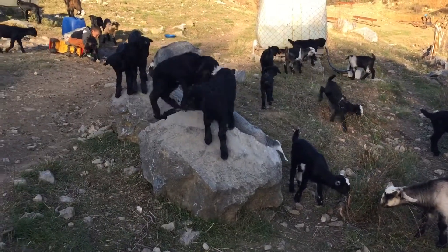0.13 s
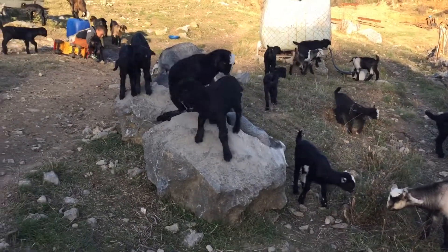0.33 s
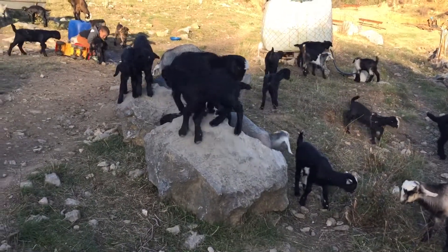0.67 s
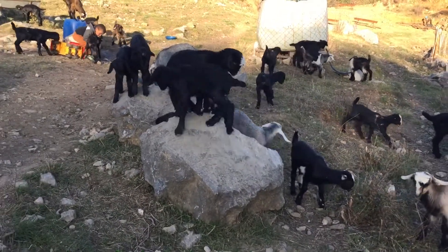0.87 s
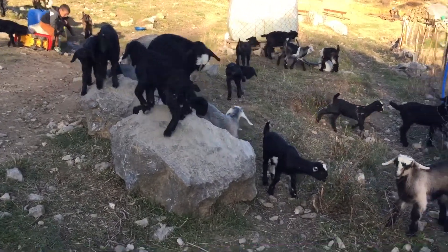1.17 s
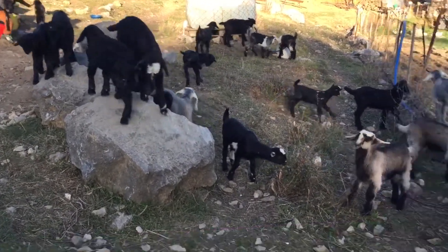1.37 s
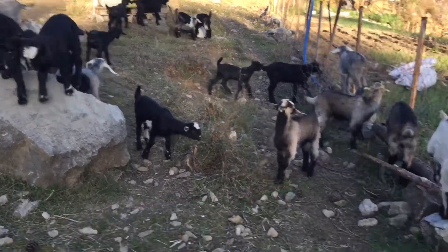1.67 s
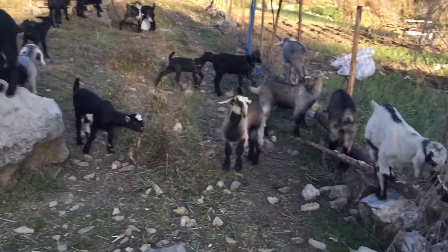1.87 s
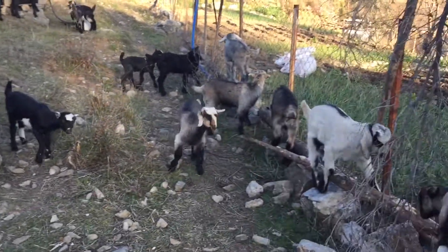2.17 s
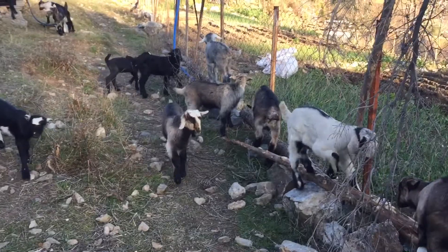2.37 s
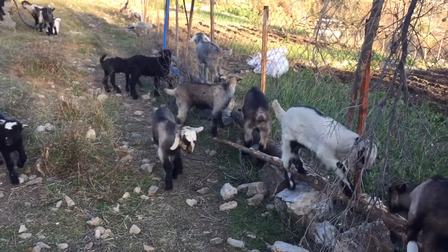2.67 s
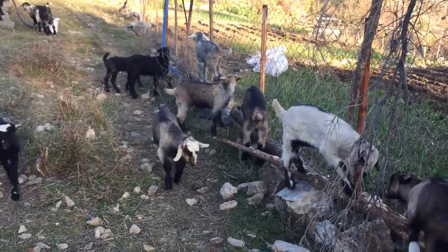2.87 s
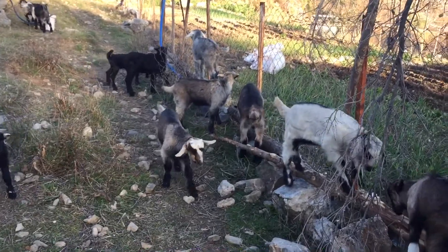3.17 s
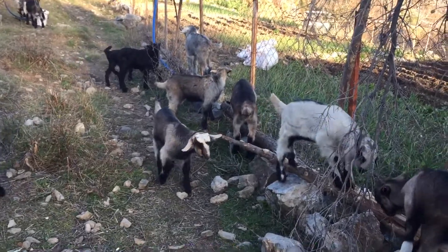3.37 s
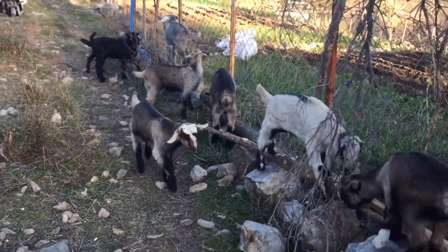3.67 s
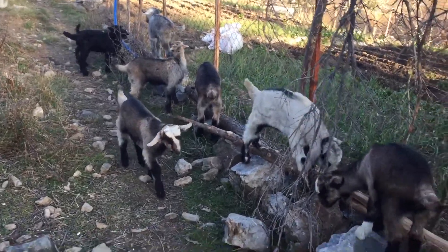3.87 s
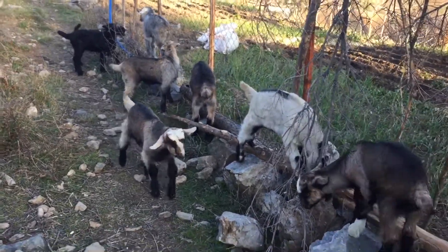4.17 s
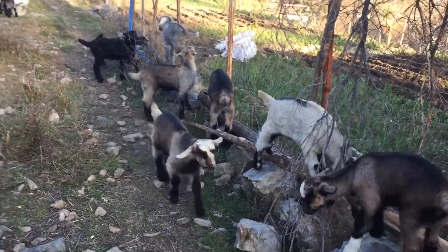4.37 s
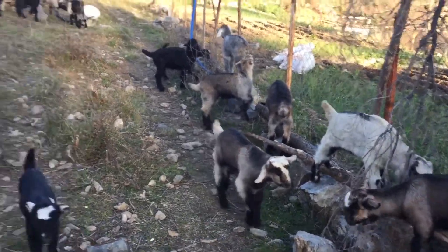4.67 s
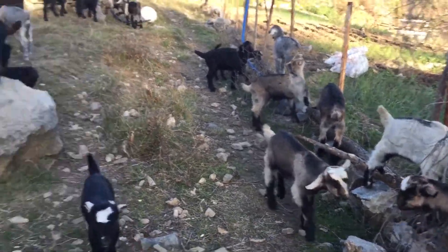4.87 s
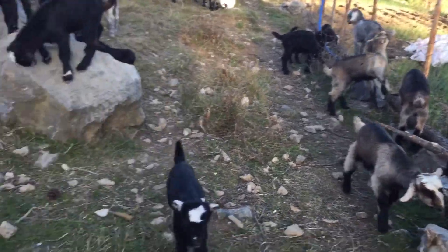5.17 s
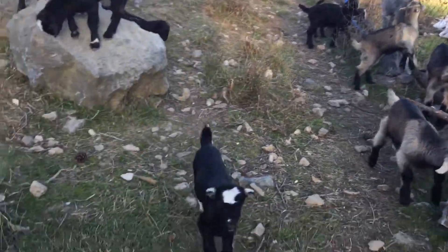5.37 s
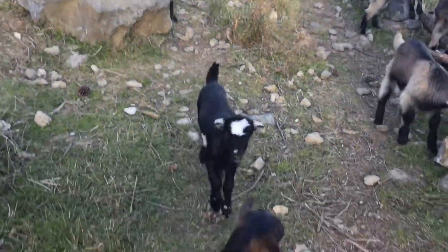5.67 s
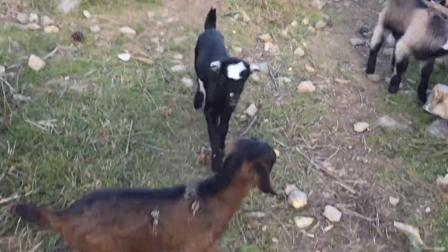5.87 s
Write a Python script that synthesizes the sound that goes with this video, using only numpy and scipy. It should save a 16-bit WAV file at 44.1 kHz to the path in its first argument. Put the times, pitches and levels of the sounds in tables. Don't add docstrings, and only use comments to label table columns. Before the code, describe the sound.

Small hooves knock, tick and thud over stones, wood and dry grass on a quiet hillside, with bird chips and a faint far kid's bleat.

```python
import sys
import numpy as np
from scipy import signal
from scipy.fft import rfft, irfft
from scipy.io import wavfile

SR = 44100
rng = np.random.default_rng(int(sys.argv[2]) if len(sys.argv) > 2 else 0)


def voltage_ratio(decibels):
    exponent = np.asarray(decibels, float) / 20
    return 10 ** exponent


def to_wav(s):
    ch = np.atleast_2d(s).T
    pcm = np.round(np.clip(ch, -1, 1) * 32767)
    wavfile.write(sys.argv[1], SR, pcm.astype(np.int16))


N = 265482


def clock(seconds):
    return np.arange(round(seconds * SR)) / SR


def in_time(rows):
    s, *columns = np.transpose(rows)
    return [np.interp(np.arange(N) / SR, s, column) for column in columns]


def rms_one(x):
    return x / np.sqrt(np.mean(x ** 2) + 1e-20)


def band(x, low_hz, high_hz):
    edges = np.clip([low_hz, high_hz], 10, 0.45 * SR)
    return signal.sosfilt(signal.butter(2, edges, "band", fs=SR, output="sos"), x)


def drift(rate):
    r = np.exp(-80 * np.pi * rate / SR)
    slow = signal.lfilter([1], [1, -2 * r, r * r], rng.standard_normal(N // 40 + 2002))[2000:]
    return np.interp(np.arange(N) / 40, np.arange(len(slow)), rms_one(slow))


def add(out, s, sound, db):
    i = round(s * SR)
    part = sound[:N - i]
    out[i:i + len(part)] += voltage_ratio(db) * part / np.max(np.abs(sound))


def dying(t, t60):
    return voltage_ratio(-60 * t / np.clip(t60, 0.004, 2))


def blow(t, rise, t60):
    rise = np.clip(rise, 0.0006, 0.03)
    contact = np.sin(np.pi / 2 * np.minimum(t / rise, 1)) ** 2
    return contact * dying(np.maximum(t - rise, 0), t60)


def swells(rows):
    t = np.arange(0, N + 40, 40) / SR
    s, length, *levels = np.transpose(rows)
    bell = np.exp(-np.abs((t[:, None] - s) / (0.75 * length)) ** 2)
    gains = [np.sqrt(bell ** 2 @ voltage_ratio(2 * db)) for db in levels]
    return [np.interp(np.arange(N) / SR, t, gain) for gain in gains]


def grains(per_s, spread_db):
    sizes = voltage_ratio(spread_db * np.minimum(rng.exponential(1, N), 4)) * rng.choice([-1, 1], N)
    return sizes * (rng.random(N) < per_s / SR)


def pebbles(clicks, low_hz, high_hz, cycles):
    out, dealt = 0, rng.integers(0, 16, N)
    for k, hz in enumerate(np.geomspace(low_hz, high_hz, 16)):
        r, w = voltage_ratio(-60 * hz / (cycles * SR)), 2 * np.pi * hz / SR
        struck = clicks * (dealt == k) + 1e-18
        out = out + signal.lfilter([0, np.sin(w)], [1, -2 * r * np.cos(w), r * r], struck)
    return rms_one(out)


def note(length, start_hz, end_hz, bend):
    u = np.arange(round(length * SR)) / (length * SR)
    hz = start_hz + (end_hz - start_hz) * u ** bend
    return np.sin(2 * np.pi * np.cumsum(hz) / SR) * np.sin(np.pi * u ** 1.3)


def air():
    # f/Hz, level/dB
    colour = [(25, -9), (55, 0), (91, 1.5), (227, -6.5), (433, -11.5), (2170, -12), (4870, -15.5),
              (11500, -21.5)]
    hz, shape = np.fft.rfftfreq(N, 1 / SR), np.array(colour)
    gain = voltage_ratio(np.interp(np.log(hz + 1), np.log(shape[:, 0]), shape[:, 1]))
    hiss = rms_one(irfft(rfft(rng.standard_normal(N)) * gain, N))
    return voltage_ratio(-67 + drift(2.7) / 2) * hiss


def trampling():
    # t/s, level/dB
    herd_level = [(0, -75), (1.5, -77.5), (2.45, -74), (2.7, -71.5), (3.3, -72), (3.5, -76), (4.7, -73.5),
                  (5.1, -64.5), (5.45, -68.5), (5.6, -58), (5.85, -66), (5.92, -68), (6.02, -58)]
    grit_db, = in_time(herd_level)
    steps = grains(500 * voltage_ratio(4 * drift(14)), 3.5)
    grit = voltage_ratio(grit_db + 4) * band(pebbles(steps, 149, 2250, 14), 80, 1100)
    chips_of_stone = voltage_ratio(-78) * pebbles(grains(260, 3.9), 1205, 9000, 98)
    rumble = rms_one(band(band(rng.standard_normal(N), 33, 65), 30, 90))
    return grit + chips_of_stone + voltage_ratio(grit_db - 4 + 3.2 * drift(5)) * rumble


def thumps():
    # t/s, length/s, level/dB
    landings = [(0.218, 0.028, -53), (0.375, 0.045, -77), (0.715, 0.029, -60), (1.583, 0.047, -42.5),
                (2.138, 0.026, -44), (2.161, 0.041, -46.5), (2.288, 0.069, -54.5), (2.462, 0.091, -48),
                (2.693, 0.06, -45), (2.765, 0.032, -54), (2.925, 0.042, -49.5), (3.061, 0.041, -50.5),
                (3.169, .1, -45.5), (3.656, 0.041, -43), (3.845, 0.025, -46.5), (3.944, 0.08, -43),
                (4.016, 0.039, -48), (4.132, 0.03, -52), (4.525, 0.06, -57), (4.915, 0.032, -45),
                (4.965, 0.071, -52), (5.06, .1, -55), (5.118, 0.14, -50), (5.228, 0.027, -46),
                (5.319, 0.088, -48), (5.608, 0.081, -45.5), (5.873, 0.079, -53), (6.0, 0.051, -32)]
    out, t = np.zeros(N), clock(0.3)
    for (s, length, db), pick in zip(landings, rng.random(len(landings))):
        hz = (52 + 30 * pick) * (1 + 0.91 * np.exp(-t / 0.016))
        wave = np.sin(2 * np.pi * np.cumsum(hz) / SR)
        add(out, s - 0.284 * length, wave * blow(t, 0.28 * length, 1.97 * length), db)
    return out


def bleats():
    # t/s, length/s, mouth at start f/Hz, mouth at end f/Hz, level/dB
    cries = [
        (0.659, 0.26, 2300, 2200, -77.5),
        (1.272, 0.28, 2160, 2224, -76),
        (4.92, .2, 2300, 2050, -74),
        (5.27, .3, 2450, 2400, -71),
    ]
    out, t = np.zeros(N), np.arange(N) / SR
    for s, length, start_hz, end_hz, db in cries:
        mouth = np.interp(t, [s, s + length], [start_hz, end_hz])
        cycles = np.cumsum(210 * (1 + 0.09 * drift(40))) / SR
        pulses = np.diff(np.floor(cycles), prepend=0) + 0.12 * rng.standard_normal(N)
        width = band(pulses, 20, 280)
        voice = rms_one(width * np.sin(2 * np.pi * np.cumsum(mouth) / SR))
        held = np.clip(np.minimum(t - s, s + length - t) / 0.05, 0, 1)
        out += voltage_ratio(db + 2.9 * drift(20)) * voice * held
    return out


def warble():
    # t/s, length/s, start f/Hz, end f/Hz, level/dB
    syllables = [(4.21, .024, 3750, 4600, -67), (4.264, 0.024, 3750, 4600, -66),
                 (4.318, .03, 3700, 4020, -71), (4.338, 0.029, 3850, 4650, -67),
                 (4.396, 0.023, 3850, 4580, -67), (4.462, 0.028, 3800, 4600, -60.5),
                 (4.555, 0.032, 3900, 4670, -67), (4.592, .065, 4250, 4020, -62),
                 (4.594, 0.065, 4780, 4570, -61), (4.6, 0.032, 5200, 5070, -72),
                 (4.655, .036, 4380, 3980, -65), (4.795, 0.073, 4300, 4100, -71),
                 (4.815, 0.044, 4680, 4780, -70), (4.855, 0.023, 5300, 4920, -68.5)]
    out = np.zeros(N)
    for s, length, start_hz, end_hz, db in syllables:
        second_db = db - 4 - 20 * (length > 0.035)
        add(out, s - 0.006, note(length, start_hz, end_hz, 0.94), db)
        add(out, s, note(length, 1.02 * start_hz, 0.94 * end_hz, 0.94), second_db)
    return out * (1 + band(rng.standard_normal(N), 60, 450) * 2.5)


def whistle():
    # t/s, f/Hz, level/dB
    glide = [
        (2.195, 9560, -72),
        (2.25, 8950, -75),
        (2.3, 8400, -68),
        (2.345, 8060, -60.5),
        (2.42, 7810, -69),
        (2.475, 7550, -81),
    ]
    hz, db = in_time(glide)
    t = np.arange(N) / SR
    on = (t > glide[0][0]) & (t < glide[-1][0])
    tone = np.sin(2 * np.pi * np.cumsum(hz) / SR)
    return on * np.sqrt(2) * voltage_ratio(db + 1.9 * drift(40)) * tone


def chips():
    # t/s, peak level/dB, top f/Hz
    calls = [
        (0.508, -52, 7650),
        (.684, -52, 7900),
        (0.855, -50.5, 7850),
        (1.085, -48.5, 8000),
        (1.237, -51, 7520),
    ]
    out, length = np.zeros(N), 0.0105
    for s, db, top_hz in calls:
        add(out, s - 0.001, note(0.0065, 4630, 0.95 * top_hz, 0.81), db - 1.5)
        add(out, s + 0.002, note(length, 0.88 * top_hz, top_hz, 0.504), db)
        add(out, s + 0.003, note(length, 0.82 * top_hz, top_hz, 1), db - 8)
    return out * (1 + band(rng.standard_normal(N), 100, 500) * 2)


def birds():
    song = chips() + warble() + whistle()
    lag = clock(0.12)
    slope = rng.standard_normal(len(lag)) * dying(lag, 0.07)
    return song + voltage_ratio(-6) * signal.fftconvolve(song, slope / np.linalg.norm(slope))[:N]


def rubble():
    # t/s, length/s, level/dB
    slides = [(.33, .03, -64.5), (1.66, 0.046, -62), (2.16, .05, -60), (2.71, 0.047, -56),
              (3.17, 0.047, -55.5), (3.25, 0.027, -68), (3.315, .03, -62), (3.48, .06, -58.5),
              (3.93, 0.054, -59), (4.48, .04, -60), (4.84, .04, -66), (5.145, .025, -60),
              (5.49, 0.046, -55), (5.54, .04, -55.5), (5.595, .04, -53), (5.675, .05, -50), (5.8, .04, -55),
              (5.87, .04, -54), (5.965, 0.027, -49.5)]
    settling, = swells(slides)
    return settling * band(pebbles(grains(900, 3.8), 280, 1050, 18), 207, 1100)


def branch():
    # t/s, f/Hz, level/dB, t60/s
    hums = [(5.6, 300, -47, .8), (5.65, 116, -46, 2.), (5.63, 460, -35, .14), (5.624, 590, -35, .1),
            (5.624, 1030, -43, .12), (5.624, 1480, -44, .11), (5.768, 620, -41, .1), (5.772, 440, -42, .11),
            (5.465, 470, -41, .07), (.594, 440, -48, .14), (1.302, 985, -49, .09), (1.97, 980, -49, .07),
            (2.14, 1000, -58, .25)]
    out, t = np.zeros(N), clock(0.27)
    for (s, hz, db, t60), noise in zip(hums, rng.standard_normal((len(hums), len(t)))):
        rattle = rms_one(band(noise, 0.9 * hz, 1.155 * hz))
        edges = np.minimum(t * hz / 2.7, 1) * np.minimum((t[-1] - t) / 0.044, 1)
        add(out, s, (np.sin(2 * np.pi * hz * t) + 0.3 * rattle) * dying(t, t60) * edges, db)
    return out * voltage_ratio(1.5 * drift(25))


def pings():
    # t/s, peak level/dB, f/Hz, t60/s
    nudges = [(.195, -52, 620, .04), (1.58, -46, 170, .06), (2.13, -48, 205, .07), (3.49, -50, 125, .1),
              (3.851, -50, 3000, .015), (3.859, -45, 740, .07), (3.86, -46, 3200, .03),
              (3.859, -49, 6200, .012), (3.88, -49, 2050, .07), (3.88, -50, 3200, .03),
              (3.912, -48, 2950, .02), (3.922, -47, 1950, .02), (3.933, -49, 3500, .02),
              (3.946, -49, 5900, .015), (3.998, -48, 2500, .04), (4.815, -56, 1350, .03),
              (4.825, -55, 620, .06), (4.886, -54, 1650, .03), (4.886, -53, 600, .04),
              (5.095, -47, 110, .12), (5.135, -49, 1480, .05), (5.296, -51, 2250, .04),
              (5.345, -56, 2350, .04), (5.42, -56, 2400, .05), (5.842, -45, 1150, .05),
              (5.865, -47, 1300, .02), (5.949, -44, 1150, .03), (5.986, -39, 1050, .04),
              (.61, -51, 440, .08), (2.221, -50, 780, .03), (2.567, -36, 1550, .035),
              (2.842, -50, 11500, .01), (2.85, -50, 5000, .01), (2.907, -47, 3500, .012),
              (2.915, -44, 14000, .01), (2.936, -45, 13000, .01), (2.965, -43, 13000, .012),
              (2.974, -49, 11500, .01), (3.149, -42, 750, .05), (3.175, -40, 180, .05),
              (3.29, -48, 1400, .04), (5.108, -53, 1150, .06), (5.148, -51, 1500, .03),
              (5.288, -51, 2900, .02), (2.955, -53, 1520, .1), (3.93, -41, 84, .16), (5.305, -42, 148, .07),
              (4.8, -52, 190, .08)]
    out, t = np.zeros(N), clock(0.15)
    for (s, db, hz, t60), apart in zip(nudges, rng.uniform(0.04, 0.12, len(nudges))):
        pair = np.sin(2 * np.pi * hz * t) + 0.5 * np.sin(2 * np.pi * hz * (1 + apart) * t)
        add(out, s, pair * blow(t, 1.5 / hz, t60), db)
    return out


def ticks():
    # t/s, peak level/dB, centre f/Hz, bright part level/dB
    snaps = [(0.21, -41, 14300, -6), (0.9662, -45, 12800, -17), (1.124, -46, 3480, -14),
             (1.1513, -45.5, 5900, -14), (1.5756, -42, 7350, -14), (1.973, -35.5, 15500, -19),
             (2.2149, -32, 3940, -12), (2.203, -43, 10500, -8), (2.306, -49, 9500, -15),
             (2.353, -42, 17500, -25), (2.492, -45, 9000, -12), (3.947, -52, 6000, -20),
             (3.923, -48, 2500, -20), (2.485, -36.5, 4400, -25), (2.5667, -28, 3100, -17),
             (2.834, -44, 12200, -13), (2.8878, -34, 15200, -16), (2.927, -35, 4470, -9),
             (2.935, -33, 3400, -12), (2.948, -37, 11000, -13), (2.9659, -36, 3320, -11),
             (3.2206, -38.5, 15200, -18), (3.2946, -36, 12800, -22), (3.359, -43, 4650, -17),
             (3.4513, -42, 7020, -5), (3.547, -48.5, 3390, 3), (3.8604, -39, 3100, 0),
             (3.88, -44, 8000, -10), (4.006, -48, 12000, -10), (4.022, -46.5, 14000, -8),
             (1.178, -47, 3200, -20), (4.104, -35, 2100, -3), (4.124, -38, 6670, 1),
             (4.202, -33, 10000, -28), (4.6492, -35, 6040, 4.5), (5.1965, -43, 3870, 4.5),
             (5.469, -25.5, 14600, -20), (5.699, -50, 6080, -8), (5.865, -40.5, 4400, 0),
             (5.942, -36.5, 2620, -2)]
    out, t = np.zeros(N), clock(0.03)
    for (s, db, hz, bright_db), noise in zip(snaps, rng.standard_normal((len(snaps), len(t)))):
        burst = 5 * (t == 0) + noise * (dying(t, 0.005) + voltage_ratio(-14) * dying(t, 0.03))
        add(out, s, band(burst, 0.78 * hz, 1.28 * hz), db - 2)
        add(out, s, band(burst, 4600, 24000), db + bright_db + 6)
    return out


def scuffs():
    # t/s, length/s, level/dB
    brushes = [(.732, 0.03, -50), (1.036, .015, -64), (1.634, 0.045, -70.5), (1.987, 0.081, -68.5),
               (2.837, 0.075, -59.5), (3.374, 0.084, -66.5), (3.965, 0.012, -62), (4.199, 0.0088, -62),
               (4.563, 0.031, -60.5), (5.689, 0.055, -55.5)]
    # t/s, length/s, level/dB
    drags = [(.213, .12, -70.5), (.532, 0.076, -68), (2.487, 0.023, -61), (2.945, 0.061, -52.5),
             (3.292, .0099, -68), (3.459, 0.025, -60.5), (3.546, 0.016, -63), (3.645, 0.034, -64),
             (4.13, 0.041, -58.5), (4.162, 0.075, -62.5), (4.626, 0.058, -59.5), (4.66, .01, -71),
             (5.197, 0.014, -56.5), (5.408, 0.07, -68), (5.471, .006, -50), (5.522, .022, -50),
             (5.49, .02, -62), (5.831, 0.11, -61)]
    # t/s, length/s, level/dB
    scrapes = [(.973, 0.012, -67.5), (2.213, 0.038, -63), (2.522, .012, -67), (2.57, .016, -59),
               (3.224, 0.019, -66), (4.014, 0.04, -65), (4.473, 0.06, -65), (4.97, 0.12, -69.5),
               (5.122, 0.085, -62), (5.228, 0.022, -62), (5.295, .04, -62.5), (5.38, .1, -67),
               (5.52, .02, -56), (5.555, .035, -62), (5.937, 0.02, -66.5)]
    # t/s, length/s, level/dB
    grinds = [
        (3.866, .022, -69),
        (3.885, .012, -72),
        (3.915, .012, -72),
        (3.941, .023, -71),
    ]
    # strokes, middle over fine part level/dB, coarse over fine part level/dB
    covers = [(brushes, -0.54, -8), (drags, 0.3, -3), (scrapes, 2.8, 5.8), (grinds, 8.6, 16.4)]
    strokes = [(s, length, db - 4, db + middle_db - 4, db + low_db - 4.5)
               for table, middle_db, low_db in covers for s, length, db in table]
    high, middle, low = swells(strokes)
    together = 1.2 * drift(50)
    clumps = [voltage_ratio(together + 2 * drift(50)) for k in range(3)]
    fine = high * clumps[0] * pebbles(grains(8000, 5.5), 9870, 15700, 28)
    crackle = middle * clumps[1] * pebbles(grains(5000, 4.5), 4500, 18000, 17)
    coarse = low * clumps[2] * band(pebbles(grains(5000, 4), 1900, 4800, 25), 1600, 6000)
    return fine + crackle + coarse


def thuds():
    # t/s, peak level/dB, ring f/Hz
    on_earth = [(.325, -43, 187), (.366, -37, 152), (.47, -40.5, 247), (2.213, -44, 450),
                (2.372, -50.5, 227), (1.975, -53.5, 179), (2.57, -41, 172), (3.925, -44, 159),
                (2.564, -37, 426), (3.217, -32, 241), (3.449, -43, 210), (3.996, -34.5, 308),
                (4.901, -44.5, 142), (5.196, -40, 320), (5.463, -37, 450), (5.503, -35.5, 460),
                (5.624, -32, 357), (2.735, -38.5, 258), (6.001, -31, 197)]
    # t/s, peak level/dB, ring f/Hz
    on_wood = [(.19, -46, 145), (.441, -42.5, 446), (2.121, -42, 462), (2.68, -20, 264), (2.721, -37, 242),
               (2.856, -29, 262), (2.989, -36, 260), (3.031, -27.5, 281), (3.138, -25.5, 238),
               (3.855, -44, 227), (4.466, -43.5, 513), (5.985, -30, 375)]
    # t/s, peak level/dB, ring f/Hz
    on_slab = [(1.727, -49, 164), (2.659, -34.5, 167), (3.079, -43, 259), (3.278, -38, 290),
               (3.46, -43.5, 395), (4.062, -50, 364), (4.283, -51.5, 190), (4.475, -45.5, 216),
               (5.3, -32, 181.4), (5.3, -35, 378), (5.559, -29, 193), (5.698, -47, 194), (5.84, -26.5, 186),
               (5.845, -35, 363), (5.985, -29.5, 177), (5.864, -35, 149)]
    # steps, rise/s, t60/s
    footings = [(on_earth, 0.0095, 0.023), (on_wood, 0.0078, 0.035), (on_slab, 0.0077, 0.07)]
    out, t = np.zeros(N), clock(0.2)
    steps = [(*step, rise, t60) for table, rise, t60 in footings for step in table]
    noise, chance = rng.standard_normal((len(steps), len(t))), rng.random(len(steps))
    for (s, db, hz, rise, t60), soil, lower in zip(steps, noise, chance):
        sag = 1 + 0.019 * np.exp(-t * hz / 2)
        body = np.sin(2 * np.pi * hz * t * sag)
        body += voltage_ratio(-9) * np.sin(2 * np.pi * hz * (0.5 + 0.25 * lower) * t)
        lumps = rms_one(band(band(soil, 0.73 * hz, 1.236 * hz), 0.3 * hz, 1.58 * hz))
        add(out, s, body * blow(t, rise, t60) + voltage_ratio(-18) * lumps * blow(t, rise, 0.26), db - 2)
    return out


def knocks():
    # t/s, peak level/dB, ring f/Hz, grit level/dB
    clacks = [(1.968, -44, 1420, -7.5), (2.12, -44, 1140, -1), (2.203, -43.5, 1260, 6),
              (2.476, -41, 505, -25), (2.565, -32, 1150, 0), (2.855, -48, 660, 6), (3.142, -36, 920, -10.5),
              (3.862, -35.5, 1310, -19), (3.879, -42, 1490, -5), (3.934, -40, 1310, 8),
              (4.069, -49.5, 850, 10), (5.13, -51, 1450, -6), (5.196, -42, 2370, 0), (5.224, -39, 1750, -3),
              (5.842, -44.5, 1330, 2), (5.95, -44, 1180, 5)]
    # t/s, peak level/dB, ring f/Hz, grit level/dB
    clinks = [(.193, -44, 1415, 1.5), (.474, -54, 1240, 3), (1.032, -46, 605, 3), (1.729, -51, 664, -1),
              (2.681, -36, 740, -5), (2.682, -43, 1140, -6), (5.953, -47, 2180, -10),
              (5.96, -42.5, 760, -4), (2.724, -45, 715, 2), (2.823, -46, 2500, -18), (2.954, -54, 1574, -7),
              (3.03, -40, 1012, 3), (3.283, -45.5, 1033, 1), (3.478, -45.5, 896, -3),
              (4.103, -52, 1975, -3), (5.282, -45.5, 804, 9), (5.507, -31, 1118, 8), (5.624, -31, 603, -6),
              (5.508, -37, 717, -4), (5.52, -39, 1080, -5), (5.512, -42, 1950, -10),
              (3.031, -44, 1780, -10), (3.48, -49, 1320, -10), (3.08, -53, 1000, 2)]
    # t/s, peak level/dB, ring f/Hz, grit level/dB
    slips = [(1.294, -48.5, 1620, -10), (1.643, -49.5, 720, 14), (2.659, -48, 896, 6),
             (3.852, -44, 1213, 4), (3.911, -43, 1390, 8), (3.997, -43.5, 765, 17), (4.466, -43, 778, -2),
             (5.3, -40.5, 994, 6), (5.579, -40, 528, -12), (5.947, -37, 790, 8), (5.985, -32, 520, -11),
             (5.996, -32.5, 424, -12)]
    # t/s, peak level/dB, ring f/Hz, grit level/dB
    rolls = [(.636, -53, 610, -10), (.776, -49, 632, -5.5), (3.442, -49, 738, -6), (5.095, -50, 1495, -2),
             (5.118, -43.5, 1454, 0), (5.452, -42.5, 620, -5)]
    # t/s, peak level/dB, ring f/Hz, grit level/dB
    raps = [(1.575, -32.5, 608, -27), (2.667, -47, 1290, -9), (2.689, -50.5, 2350, -20),
            (2.736, -46.5, 695, -13), (2.998, -50, 1300, -15), (3.22, -48, 1000, -15),
            (3.619, -37, 675, -22), (3.62, -42, 1900, -22), (5.909, -53.5, 1200, -15),
            (6.016, -46, 1490, -15)]
    # blows, rise/s, t60/s, rattle of neighbouring stones level/dB
    contacts = [(clacks, 0.0013, 0.0056, -15.5), (clinks, 0.00055, 0.041, -14.5), (slips, 0.0047, 0.02, -9),
                (rolls, 0.012, 0.043, -11), (raps, 0.00095, 0.0059, -23)]
    out, t = np.zeros(N), clock(0.12)
    hits = [(*hit, *contact) for table, *contact in contacts for hit in table]
    noise, chance = rng.standard_normal((len(hits), len(t))), rng.random((len(hits), 2, 5))
    for (s, db, hz, grit_db, rise, t60, rattle_db), grit, (ratio, size) in zip(hits, noise, chance):
        near = hz * 2 ** (1.5 * ratio[:, None] - 0.55)
        neighbours = (size[:, None] * hz / near * np.sin(2 * np.pi * near * t)).sum(0)
        modes = np.sin(2 * np.pi * hz * t) + voltage_ratio(-7.5) * neighbours
        crumbs = grit * (np.abs(grit) > 2.45)
        crunch = band(crumbs, 490, 1660) * 10 + band(band(crumbs, 1400, 2800), 1460, 4800)
        crunch = rms_one(crunch) * voltage_ratio(min(grit_db, 6) - 9)
        rattle = sum(band(crumbs, 0.943 * stone, 1.06 * stone) for stone in [hz, *near[:, 0]])
        rattle = rms_one(rattle) * voltage_ratio(rattle_db)
        add(out, s, modes * blow(t, rise, 1.4 * t60) + (crunch + rattle) * blow(t, rise, 0.088), db + 1.5)
    return out


def scene():
    hillside = air() + birds() + bleats()
    soil_and_stones = trampling() + thumps() + rubble() + branch() + pings()
    hooves = ticks() + scuffs() + thuds() + knocks()
    return (hillside + soil_and_stones + hooves)[None]


def low_pass(x):
    return signal.sosfilt(signal.butter(12, 16630, fs=SR, output="sos"), x)


def record(dry):
    port = signal.lfilter(*signal.iirpeak(10450, 9, fs=SR), dry)
    top = signal.ellip(10, 0.5, 32, 15850, fs=SR, output="sos")
    bottom = signal.butter(4, 36, "high", fs=SR, output="sos")
    mix = signal.sosfilt(np.vstack([top, bottom]), dry - 0.45 * port)
    return low_pass(mix)


dry = scene()
out = record(dry)
to_wav(out)
```